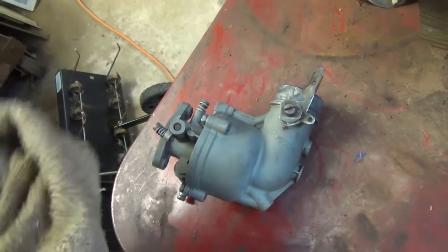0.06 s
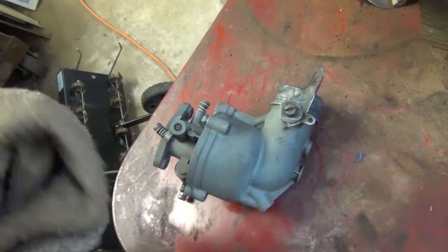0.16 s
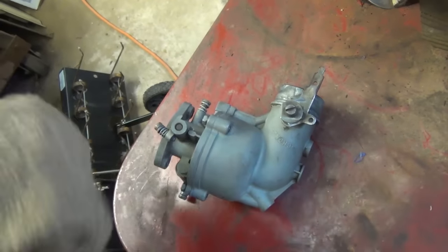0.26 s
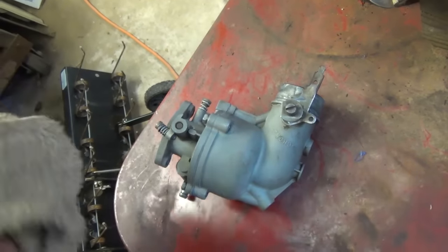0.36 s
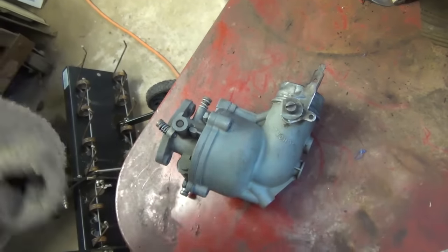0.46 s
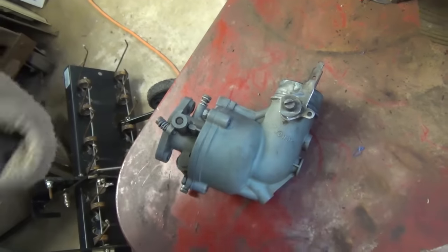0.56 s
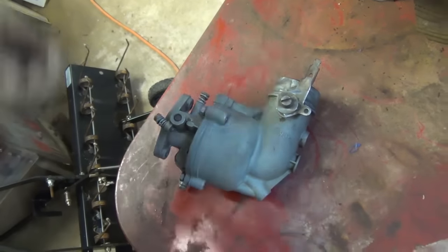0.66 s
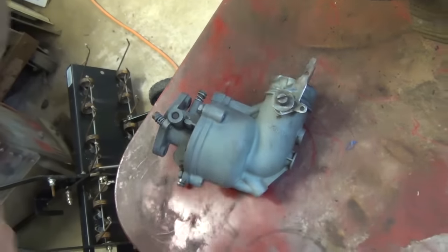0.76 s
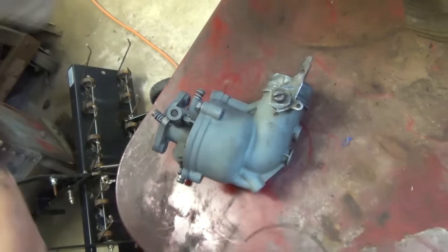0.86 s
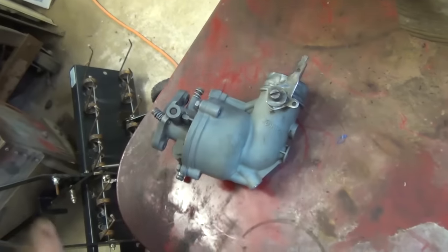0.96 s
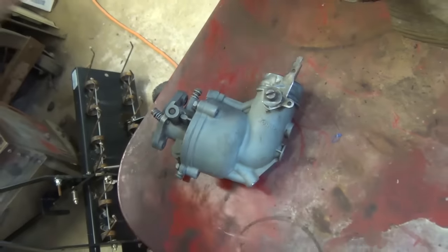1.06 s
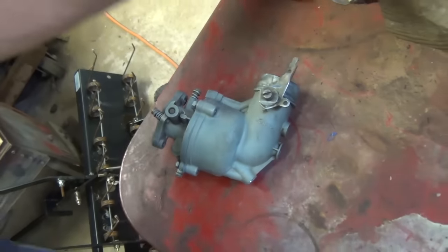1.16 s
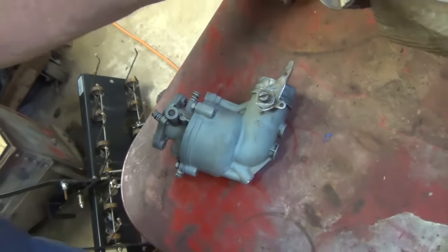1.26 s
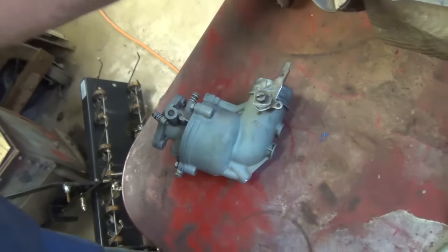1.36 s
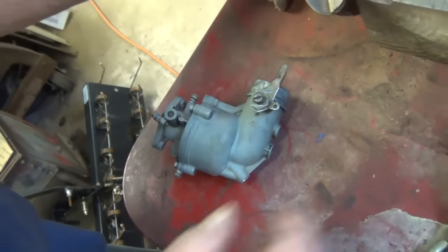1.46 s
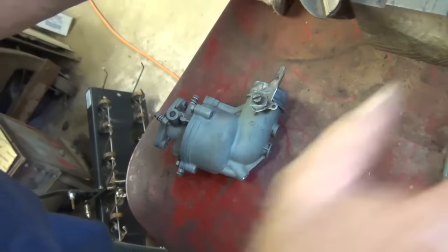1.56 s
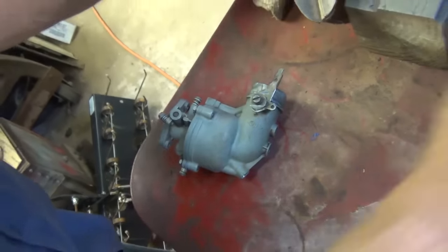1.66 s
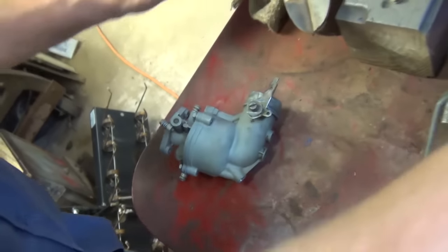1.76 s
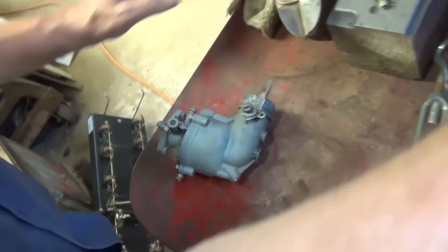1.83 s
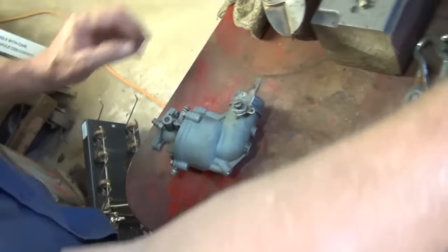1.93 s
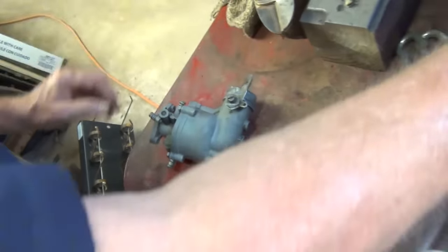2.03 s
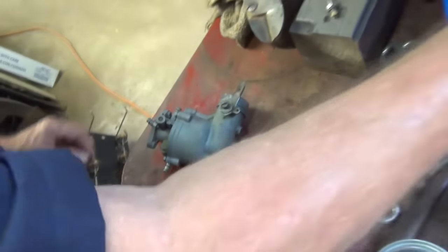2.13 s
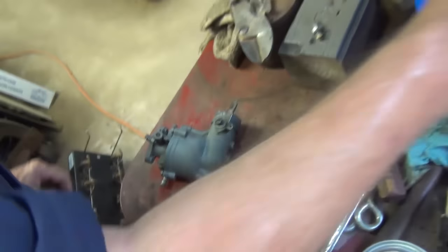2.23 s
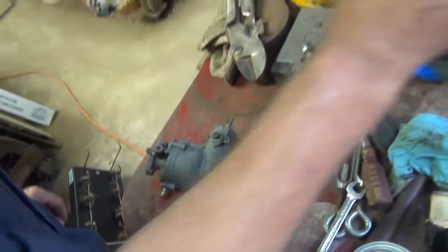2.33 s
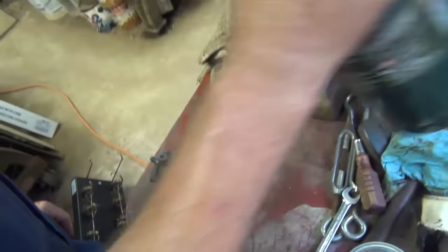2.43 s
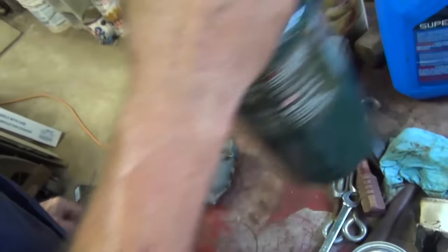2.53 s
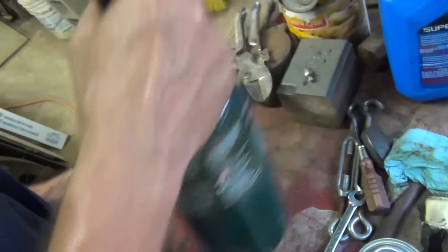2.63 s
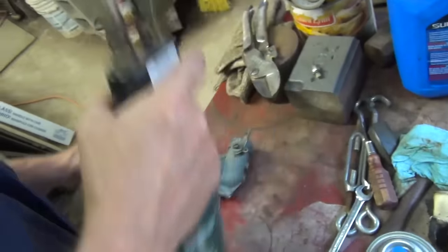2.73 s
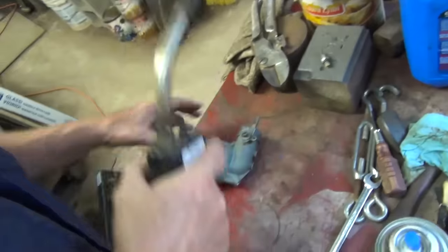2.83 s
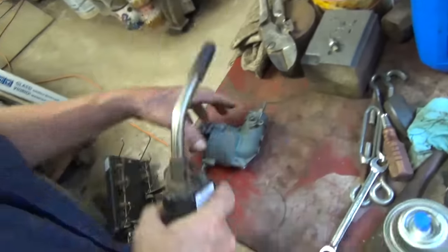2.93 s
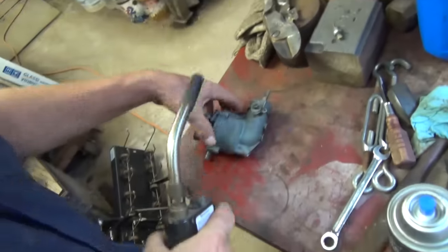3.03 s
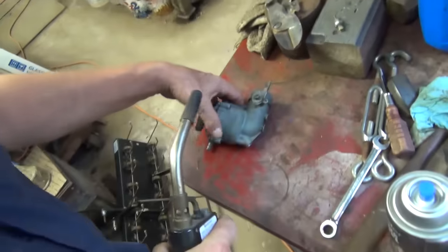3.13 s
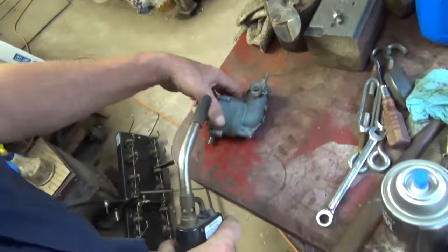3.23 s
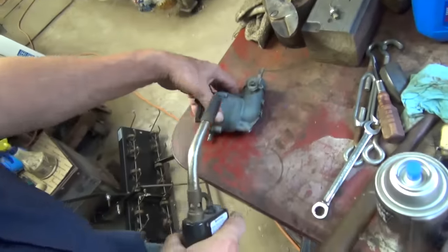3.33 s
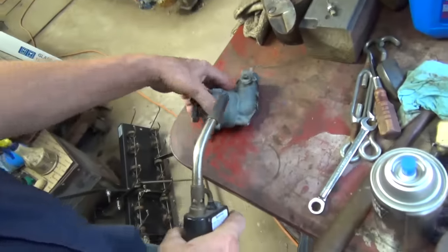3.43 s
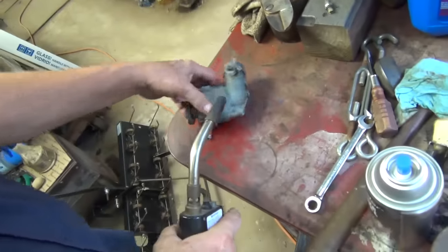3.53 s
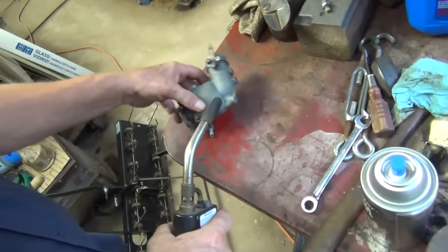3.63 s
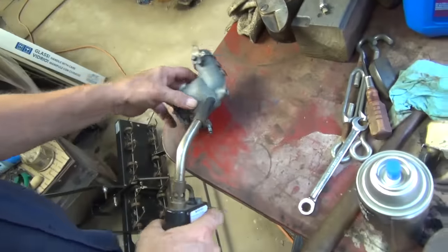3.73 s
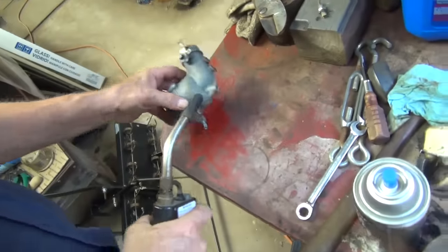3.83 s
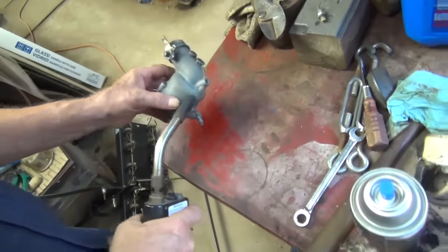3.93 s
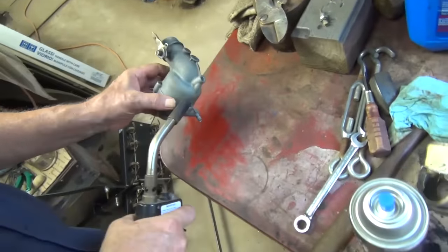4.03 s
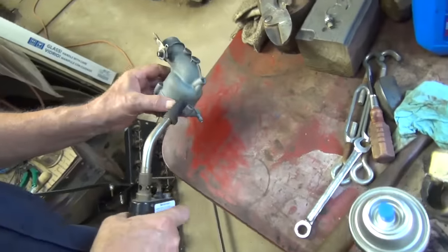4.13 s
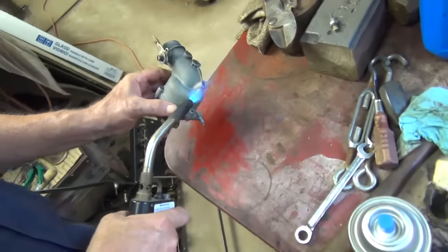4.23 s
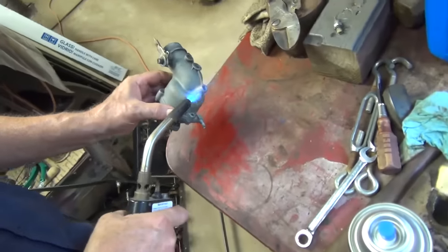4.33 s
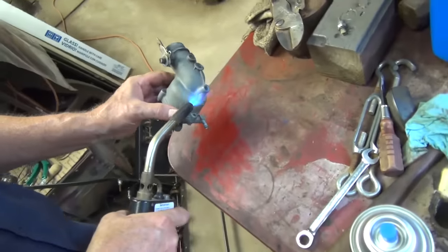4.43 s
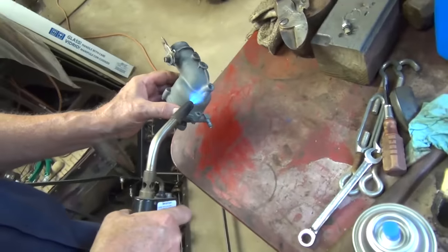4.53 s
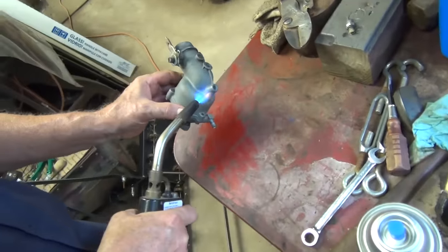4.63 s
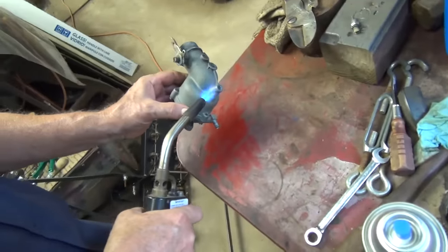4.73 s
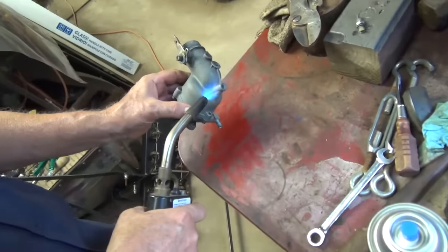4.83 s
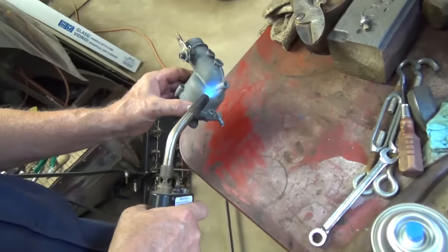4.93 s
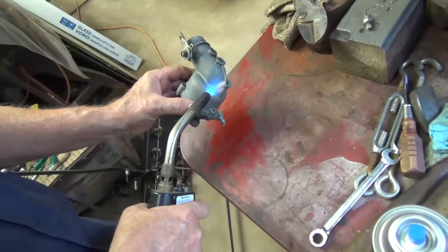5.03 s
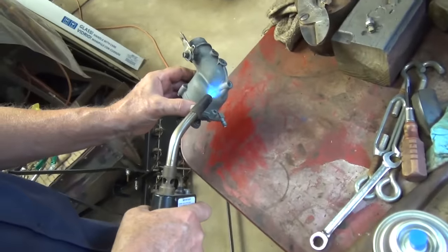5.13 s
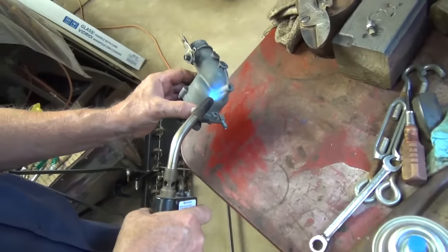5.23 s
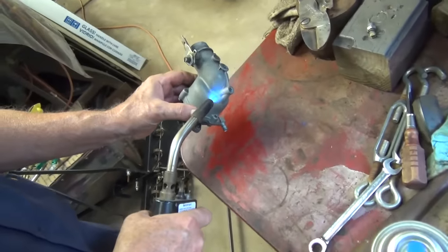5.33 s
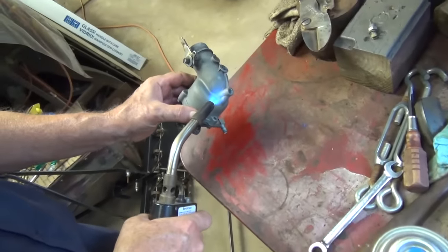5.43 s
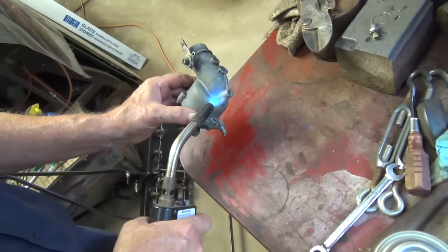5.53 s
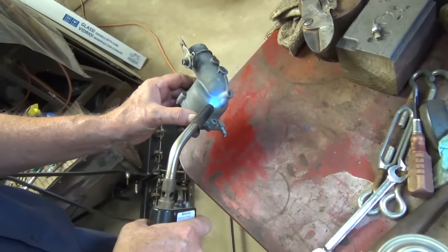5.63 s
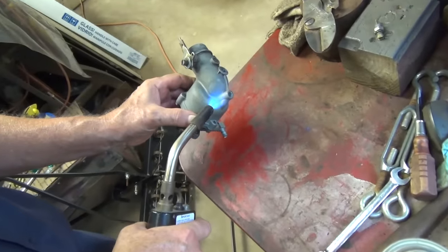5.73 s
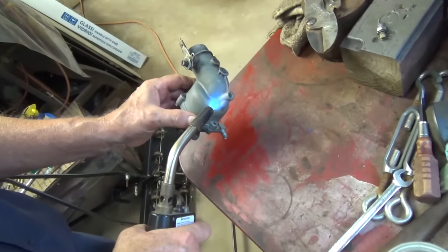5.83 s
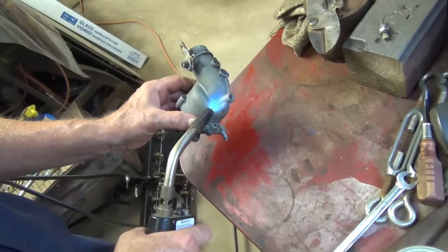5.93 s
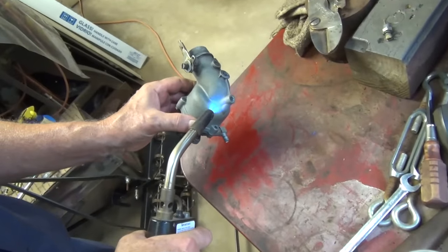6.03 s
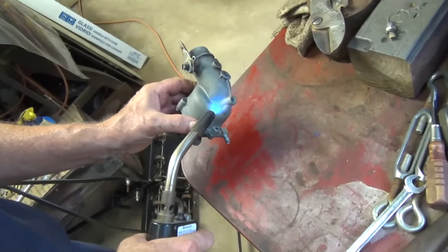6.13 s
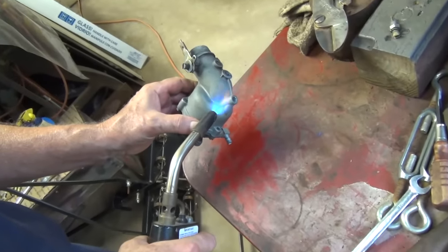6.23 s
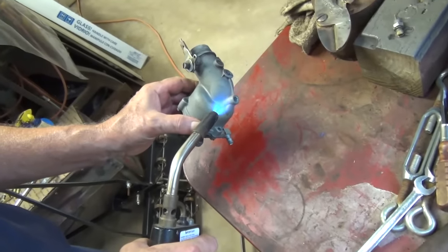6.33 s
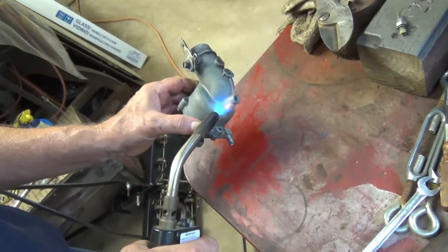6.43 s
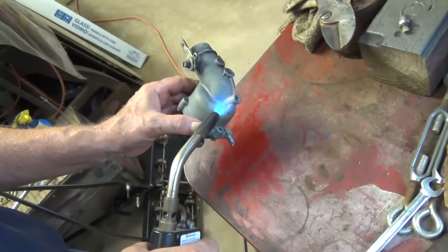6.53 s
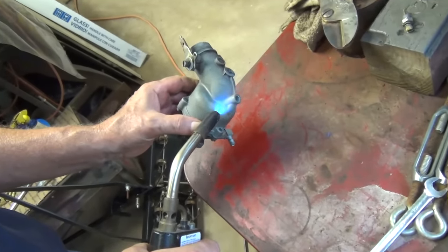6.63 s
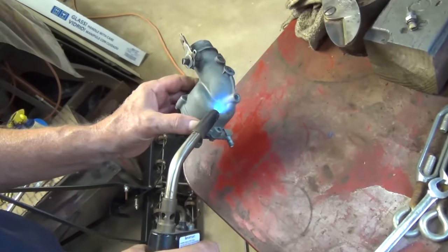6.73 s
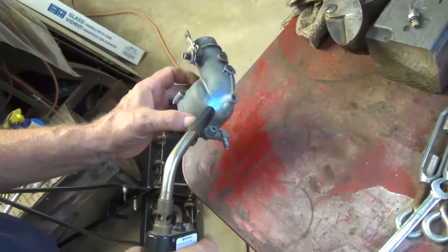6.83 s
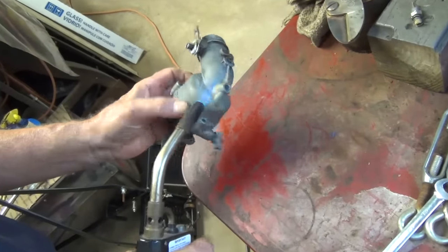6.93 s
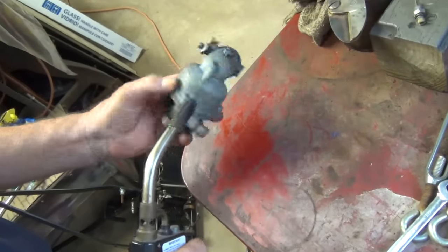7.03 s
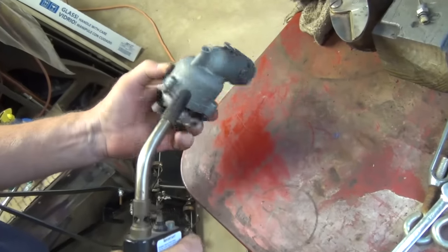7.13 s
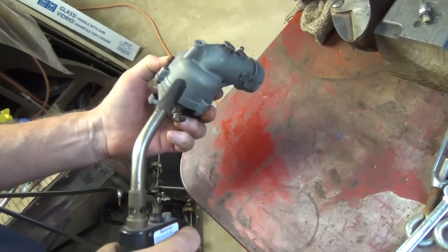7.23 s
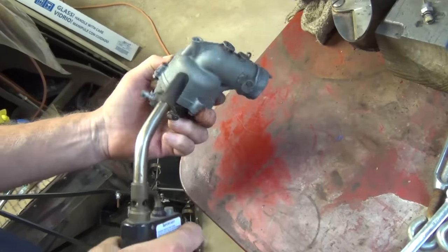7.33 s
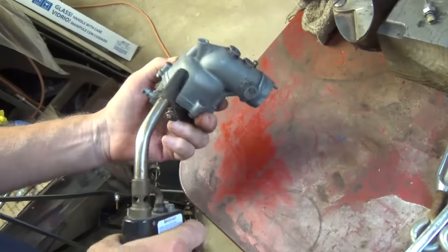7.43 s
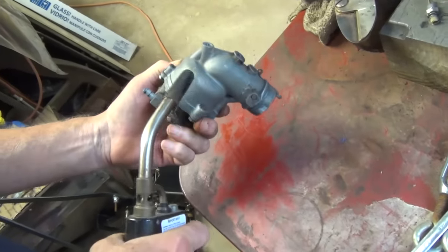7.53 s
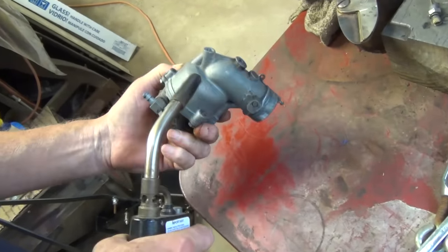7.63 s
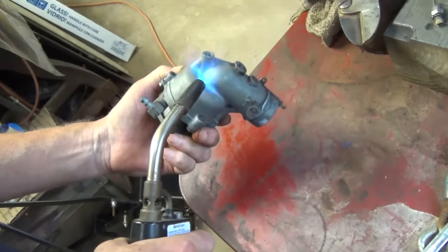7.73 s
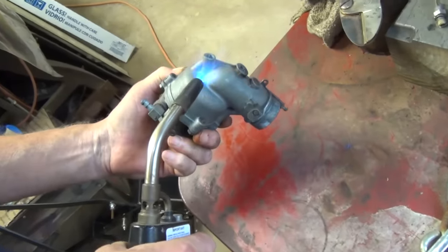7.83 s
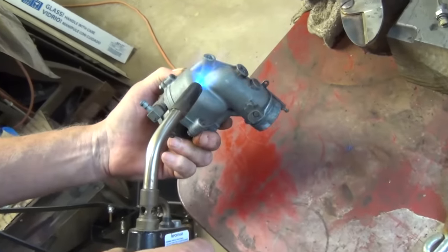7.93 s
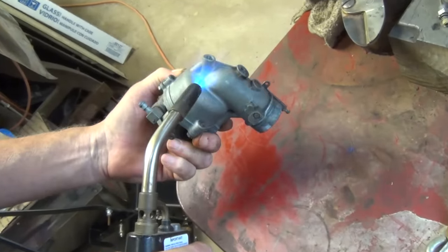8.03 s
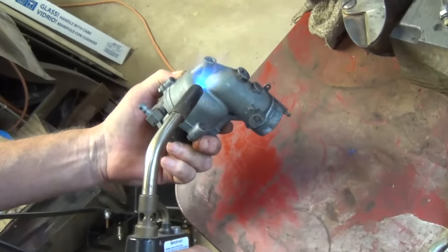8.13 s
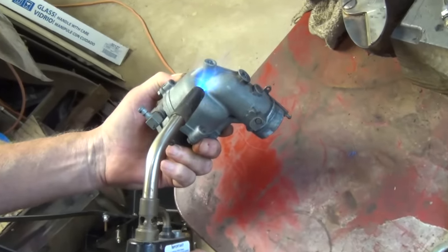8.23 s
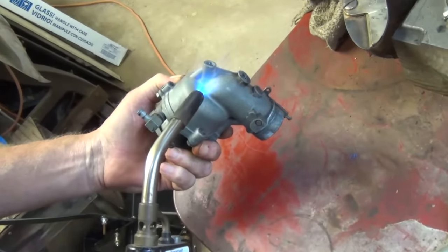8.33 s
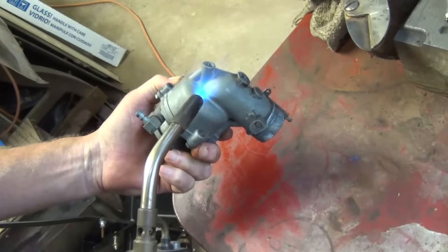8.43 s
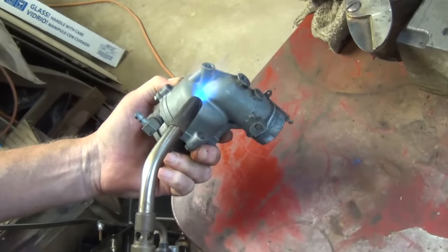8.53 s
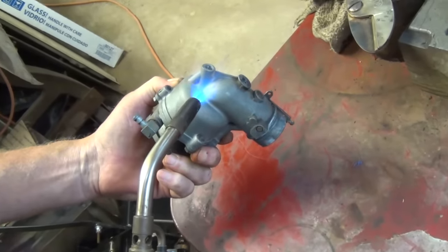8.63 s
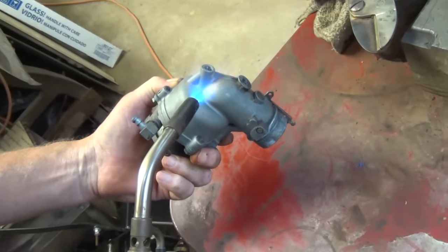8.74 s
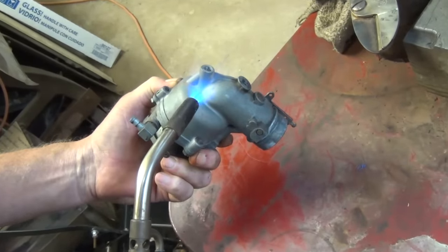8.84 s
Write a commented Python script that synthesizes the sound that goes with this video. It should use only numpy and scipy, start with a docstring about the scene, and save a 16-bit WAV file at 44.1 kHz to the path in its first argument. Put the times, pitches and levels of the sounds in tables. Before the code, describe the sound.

Knocks and dull bumps on a steel bench, gritty scrapes, then a gas torch hisses, snaps alight and roars, cuts out, and relights.

```python
"""A hand-held gas torch roars on a cast metal body over a steel workbench: gas hisses, the igniter snaps, flame catches.
Jet and flame are shaped noise, coloured by the tube and by where the flame plays; a low puff marks each lighting.
Before and between the burns come struck-mode knocks and bumps, noise clicks, gritty scrapes and a trigger squeak.
The torch is lit twice and still burns at the end. Behind it lie a faint lens-motor buzz, made by pulses ringing
a case, and the soft noise of a quiet workshop."""
import sys
import numpy as np
from scipy import signal
from scipy.fft import rfft, irfft, next_fast_len
from scipy.io import wavfile
from scipy.ndimage import uniform_filter1d

SR = 44100
rng = np.random.default_rng(int(sys.argv[2]) if len(sys.argv) > 2 else 0)


def file_out(sig):
    """Save sig as 16-bit WAV at sys.argv[1]."""
    # one column per channel
    cols = np.atleast_2d(sig).T
    # limit, then scale
    lim = np.clip(cols, -1, 1)
    pcm = np.round(lim * 32767).astype(np.int16)
    wavfile.write(sys.argv[1], SR, pcm)


N = 391166
FFT_SIZE = next_fast_len(N + 8192)
TIME, FREQ = np.arange(N) / SR, np.fft.rfftfreq(FFT_SIZE, 1 / SR)

# Torch burns: gas_on_s, valve_opening_s, gas_off_s, gas_db, flame_db, snap_db, puff_db
BURNS = [(4.060, 0.022, 6.946, -28, -15, -8.5, -6.5), (7.543, 0.017, 9.0, -26.5, -15, -8, -8)]
# Igniter snaps, one a burn: start_s
SPARK_TIMES = [4.2546, 7.7752]
# Spectrum of the burning jet's roar: freq_hz, level_db
FLAME_SPECTRUM = [(30, -39), (60, -28), (100, -18), (160, 0.5), (330, -1.04), (500, -5.5), (1000, -11),
                  (1500, -6), (2400, -12), (4500, -20), (8500, -15.5), (12000, -24.5), (15500, -35.5)]
# Spectrum of the unlit jet's hiss: freq_hz, level_db
GAS_SPECTRUM = [(30, -29), (400, -21.5), (1500, -10.5), (4000, -12.2), (6000, 1), (9500, -2), (13000, -8.5),
                (15500, -23.7)]
# Spectrum of the igniter snap: freq_hz, level_db
SNAP_SPECTRUM = [(200, -12), (1400, -6), (4000, -7), (8000, -2), (11000, 1), (16000, -17)]
# Peaks and notches that tube, casting and bench give the roar as the flame nears the casting,
# then plays on its edge, side and top: freq_hz, half_width_hz, gain_db
FLAME_NEARING = [(1038, 117, -5.5), (1236, 100, 2), (2116, 170, 2.5), (2570, 130, -9), (3150, 190, 2),
                 (4020, 170, -12), (4930, 532, -8), (7362, 530, -4.4), (14000, 974, -4)]
FLAME_ON_EDGE = [(193, 71, 3.3), (336, 20, 8), (934, 356, 4.5), (1024, 110, -10), (1680, 167, -4),
                 (2546, 120, -9), (2840, 140, -15), (2950, 580, -8), (3080, 1040, 13.5), (4586, 600, -11.5),
                 (5600, 400, 4.5), (7800, 1200, -2), (11071, 472, -3), (15239, 464, -2.6)]
FLAME_ON_SIDE = [(181, 6, 6), (259, 17, 3), (348.6, 12, 5.5), (407, 24, -4.5), (450, 51, 3), (603, 18, 6.5),
                 (725, 12, 6), (811, 9.4, 9.5), (1057, 57, -9.5), (1740, 110, -2.5), (2248, 205, 5),
                 (2890, 250, -8.5), (3520, 390, 7.9), (4935, 330, -10.4), (5806, 190, 8.5),
                 (6200, 150, -5.8), (6950, 410, -6.5), (8670, 200, -6), (10800, 560, -3), (13500, 331, -5)]
FLAME_ON_TOP = [(147, 10, -7), (409, 15, -7.5), (625, 41, -7), (718, 24, 3), (770, 16, -16), (806, 29, 6),
                (912, 35, -3.5), (1220, 232, 3.5), (1780, 75, -3), (2200, 190, -2), (2530, 76, -9),
                (3030, 110, 3.5), (3460, 220, 4.5), (3790, 96, -3.5), (5200, 118, -3), (6102, 260, 9.5),
                (6634, 590, -4.5), (9040, 1400, 3.5), (12092, 184, 1), (14364, 473, 0)]
# Path of the flame through those four aims: time_s, aim_index (no unit)
AIM_PATH = [(4.38, 0), (4.7, 1), (5.2, 2), (7.0, 2), (7.5, 3)]
# Burner-tube peaks and notches on the unlit jet, aimed at the side and the top: freq_hz, half_width_hz, gain_db
JET_AT_SIDE = [(1039, 265, 10), (1287, 509, -5), (2180, 60, 15), (2716, 197, 6), (3550, 105, 8),
               (4096, 560, -4), (4830, 172, 9), (5149, 138, -7), (6220, 173, 9), (6565, 189, -6.4),
               (7372, 257, -6.1), (7823, 240, 8), (9877, 307, -4.9), (11875, 332, 6)]
JET_AT_TOP = [(997, 60, 13), (1686, 136, 10), (1734, 350, -13.5), (2286, 360, 10.5), (3481, 116, 8.5),
              (4048, 697, -6.5), (5187, 220, -10.1), (6204, 1000, 4.5), (6600, 184, -7.1), (7271, 146, -13),
              (9400, 177, 6), (11000, 197, -6.0), (12302, 184, -1), (13960, 521, -13.0), (13978, 1000, 8.7)]

# Hard knocks on the bench: start_s, level_db
KNOCKS = [(0.005, -26.5), (0.037, -25), (0.160, -34), (0.1863, -22)]
# Modes of the steel top: pitch_hz, level_db, t60_s
BENCH_MODES = [(67, -7, 0.71), (132.3, -7, 1), (148, -8.5, 1.95), (223, -6, 0.29), (325, -5, .4),
               (390, -3, 0.35), (400, -4, 0.9), (562, -12, 0.22), (637, -4, 0.22), (783, -14, .35),
               (980, -17, .4)]
# Dull bumps of things picked up and moved: start_s, thud_db, thud_hz, thud_t60_s, clatter_db
BUMPS = [(1.158, -34, 246, .18, -28.5), (1.192, -36, 257, 0.11, -33), (1.228, -15, 183, 0.059, -38),
         (2.051, -17.5, 214, .053, -32.5), (2.079, -25, 195, .095, -49), (2.12, -22, 208, .07, -34),
         (2.142, -22, 199, 0.11, -36), (3.143, -29.5, 360, 0.1, -37), (3.407, -27, 148, 0.18, -37),
         (3.639, -23, 121, 0.19, -32), (3.664, -30, 150, .093, -28)]
# Light metal clicks of torch and casting: start_s, level_db
CLICKS = [(2.052, -37), (2.825, -34), (3.1856, -24.5), (3.6925, -25), (3.715, -32), (3.933, -25),
          (6.931, -20), (7.0518, -26.5), (7.093, -26)]
# Resonances of the clicking metal: pitch_hz, width_hz, level_db
METAL_MODES = [(1660, 260, -1), (2980, 790, -3.5), (3820, 330, -0.5), (4680, 240, -15), (6640, 490, -1.5),
               (9700, 280, -5)]
# Rubbing and dragging strokes: start_s, length_s, force_db
SCRAPES = [(1.338, .08, -8), (1.73, 0.28, -13), (2.04, .17, -12), (2.68, 0.099, -10), (3.233, .16, -5.5),
           (3.441, 0.073, -5.5), (3.475, 0.22, 0), (3.853, .13, -7.5), (7.034, 0.0156, -1)]
# Spectra of the gritty rasp and the bench rumble: freq_hz, level_db
RASP_SPECTRUM = [(300, -16), (900, -2), (1900, 1), (3000, -4.5), (4500, -7), (6000, -5), (10000, -7.5),
                 (15000, -21)]
RUMBLE_SPECTRUM = [(80, -17), (200, -7), (380, 0.5), (560, -6.5), (900, -11), (2000, -31)]
# Slips of the trigger: start_s, length_s, level_db
SLIPS = [(7.006, .007, -25), (7.012, .013, -27.5)]

# Case resonances of the lens motor: freq_hz, half_width_hz, gain_db
LENS_CASE = [(4160, 300, 9.5), (4760, 255, 14.5), (5700, 520, 8), (9020, 1240, 19.5), (12600, 1360, 12.5)]
# Quiet workshop noise: freq_hz, level_db
AIR_SPECTRUM = [(20, -15), (70, 1.5), (140, 0.5), (300, -3), (800, -8.5), (1300, -15), (1900, -17.5),
                (2700, -22.5), (7000, -21), (15000, -40)]
# Peaks and notches of the workshop noise: freq_hz, half_width_hz, gain_db
AIR_PEAKS = [(426, 54, -4), (540, 41, 2.5), (675, 57, -2.5), (830, 100, 2), (1135, 26, 6.5),
             (1840, 160, 2.5)]
# Stereo balance: freq_hz, left_minus_right_db
BALANCE = [(60, 3.5), (125, 2), (250, -0.8), (420, -0.5), (650, -3.5), (1000, -1.1), (2000, 0.5),
           (15000, -0.5)]

# Ring and thud against the knock's clatter; the thud comes late, as the top flexes
KNOCK_RING_DB, KNOCK_THUD_DB, KNOCK_FLEX_S = -11.5, -2.5, 0.0117
# Loose parts: first bounce against the knock, then the loss at each further one
BOUNCE_DB, BOUNCE_LOSS_DB, BOUNCE_COUNT, BOUNCE_GAP_S = -16, 0.5, 3, 0.079
CLICK_T60_S = 0.026
STROKE_PEAK = 0.52  # share of a stroke spent swelling
# Levels at 0 dB force; growth is dB of rumble per dB of force
RASP_DB, RUMBLE_DB, RUMBLE_GROWTH = -33, -30.5, 1.7
# Settled pitch, share by which it starts flat, settling time constant
SQUEAK_HZ, SQUEAK_FLAT, SQUEAK_SETTLE_S = 3850, 0.035, 0.0056
# Mean pulse rate, steady level, starting offset, run-up time constant
LENS_HZ, LENS_DB, LENS_START_DB, LENS_RUN_UP_S = 156.7, -41.5, -6, 0.27
AIR_DB, HANDLING_ROOM_DB = -44.5, -8.0
EDGE_HZ = 15850  # top of the output band


def amp(db):
    """Decibels to gain."""
    return 10 ** (np.asarray(db) / 20)


def unit(x):
    """Scales to rms 1."""
    return x / np.sqrt(np.mean(x ** 2) + 1e-20)


def noise():
    """White noise as long as the scene."""
    return rng.standard_normal(N)


def slope(points):
    """A spectrum in dB from a few points, straight on a log-frequency axis."""
    hz, db = np.transpose(points)
    return np.interp(np.log(FREQ + 1), np.log(hz + 1), db)


def peaks(rows):
    """Bell-shaped peaks and notches in dB."""
    return sum(db * np.exp(-np.minimum(((FREQ - hz) / width) ** 2, 50)) for hz, width, db in rows)


def colour(x, db):
    """Filters by a spectrum in dB."""
    return irfft(rfft(x, FFT_SIZE) * amp(db), FFT_SIZE)[:N]


def wander(hz):
    """Random drift of rms 1, up to a given rate."""
    return unit(colour(noise(), -20 * np.log10(1 + (FREQ / hz) ** 4)))


def turbulence(lumps_db, lumps_hz):
    """White noise whose strength comes in lumps."""
    return noise() * amp(lumps_db * wander(lumps_hz))


def rise(s, length):
    """Goes smoothly from 0 to 1, beginning at s."""
    return np.sin(np.pi / 2 * np.clip((TIME - s) / length, 0, 1)) ** 2


def dying(t60, attack):
    """One second of a quick rise and an exponential fall."""
    t = TIME[:SR]
    return (1 - np.exp(-t / attack)) * np.exp(-np.log(1000) * t / t60)


def ring(hz, t60, attack):
    """One struck mode."""
    return np.sin(2 * np.pi * hz * TIME[:SR]) * dying(t60, attack)


def add(mix, s, sound):
    """Mixes a sound in at time s."""
    part = mix[max(round(s * SR), 0):][:len(sound)]
    part += sound[:len(part)]


def flame_roar():
    """Lumpy turbulence roars through resonances that crossfade as the flame moves over the casting."""
    eddies = turbulence(lumps_db=0.73, lumps_hz=110) * amp(0.45 * wander(13))
    place = np.interp(TIME, *np.transpose(AIM_PATH))
    roar = np.zeros(N)
    for k, aim in enumerate((FLAME_NEARING, FLAME_ON_EDGE, FLAME_ON_SIDE, FLAME_ON_TOP)):
        sound = unit(colour(eddies, slope(FLAME_SPECTRUM) + peaks(aim)))
        roar += np.maximum(1 - abs(place - k), 0) * sound
    return roar


def torch():
    """Gas hisses through the tube until the spark; the flame puffs alight, roars, and dies with the pressure."""
    roar = flame_roar()
    out = np.zeros(N)
    for burn, spark, tube in zip(BURNS, SPARK_TIMES, (JET_AT_SIDE, JET_AT_TOP)):
        on, opening, off, gas_db, flame_db, snap_db, puff_db = burn
        jet = unit(colour(noise(), slope(GAS_SPECTRUM) + peaks(tube)))
        snap = unit(colour(noise(), slope(SNAP_SPECTRUM)))[:SR]
        pressure = np.exp(-np.maximum(TIME - off, 0) / 0.026)  # the tube empties once the valve shuts
        out += amp(gas_db) * jet * rise(on, opening) * (1 - rise(spark + 0.022, 0.11))
        out += amp(flame_db) * roar * rise(spark - 0.008, 0.062) * pressure
        add(out, spark, amp(snap_db) * snap * dying(t60=0.015, attack=0.0001))
        # the gathered gas burns at once
        add(out, spark + 0.0044, amp(puff_db) * ring(hz=174, t60=0.077, attack=0.0016))
    # clutter on the bench ripples the hiss
    echoes = colour(workshop(out, t60=0.064), slope([(500, -32), (1100, -11.0), (15000, -13.5)]))
    return out + echoes


def clatter(edge_hz, t60):
    """The short, dull crunch of two things meeting: decaying band-limited noise."""
    band = signal.butter(2, [140, edge_hz], "band", fs=SR, output="sos")
    return unit(signal.sosfilt(band, rng.standard_normal(SR))) * dying(t60, attack=0.00065)


def thud(hz, t60):
    """A low damped mode with one overtone."""
    return np.sqrt(2) * (ring(hz, t60, attack=0.0019) + amp(-7) * ring(1.3 * hz, t60, attack=0.005))


def bench_ring():
    """The steel top rings in its modes; each spot on it favours other ones."""
    share_db = 2.7 * rng.standard_normal(len(BENCH_MODES))
    return sum(amp(mode_db + extra_db) * ring(hz, t60, attack=0.002)
               for (hz, mode_db, t60), extra_db in zip(BENCH_MODES, share_db))


def knocks():
    """A hard knock clatters, thuds and rings the steel top; loose parts on it bounce a few times afterwards."""
    out = np.zeros(N)
    for s, db in KNOCKS:
        strike = clatter(edge_hz=1040, t60=0.083) + amp(KNOCK_RING_DB) * bench_ring()
        add(out, s, amp(db) * strike)
        add(out, s + KNOCK_FLEX_S, amp(db + KNOCK_THUD_DB) * thud(hz=121, t60=0.16))
        for k in range(BOUNCE_COUNT):
            bounce_db = db + BOUNCE_DB - k * BOUNCE_LOSS_DB
            add(out, s + (k + 1) * BOUNCE_GAP_S, amp(bounce_db) * clatter(edge_hz=610, t60=0.11))
    return out


def bumps():
    """Each bump is a damped thud and a short clatter."""
    out = np.zeros(N)
    for s, thud_db, hz, t60, clatter_db in BUMPS:
        add(out, s, amp(thud_db) * thud(hz, t60))
        add(out, s, amp(clatter_db) * clatter(edge_hz=720, t60=0.097))
    return out


def clicks():
    """Metal parts held in the hand tick with broad, quickly damped resonances."""
    out = np.zeros(N)
    for s, db in CLICKS:
        add(out, s, amp(db) * rng.standard_normal(SR) * dying(CLICK_T60_S, attack=0.00015))
    body = sum(amp(db) ** 2 / (1 + (2 * (FREQ - hz) / width) ** 2) for hz, width, db in METAL_MODES)
    return colour(out, 10 * np.log10(body / body.mean()))


def scrapes():
    """Gritty strokes swell and fade; the harder one presses, the more the bench rumbles under the rasp."""
    rasp = unit(colour(turbulence(lumps_db=2.5, lumps_hz=300), slope(RASP_SPECTRUM)))
    rumble = unit(colour(turbulence(lumps_db=-1.5, lumps_hz=70), slope(RUMBLE_SPECTRUM)))
    out = np.zeros(N)
    for start, length, force_db in SCRAPES:
        stroke = np.interp((TIME - start) / length, [0, STROKE_PEAK, 1], [0, 1, 0])
        out += stroke * amp(RASP_DB + force_db) * rasp
        out += stroke * amp(RUMBLE_DB + RUMBLE_GROWTH * force_db) * rumble
    return out


def squeak():
    """The trigger slides back in two slips; its three-harmonic squeak starts flat and settles on pitch."""
    since = np.maximum(TIME - SLIPS[0][0], 0)
    hz = SQUEAK_HZ * (1 - SQUEAK_FLAT * np.exp(-since / SQUEAK_SETTLE_S))
    phase = 2 * np.pi * np.cumsum(hz * (1 + 0.0086 * wander(300))) / SR
    tone = 0.68 * np.sin(phase) + np.sin(2 * phase) + 0.52 * np.sin(3 * phase)
    slips = np.zeros(N)
    for s, length, db in SLIPS:
        slips += amp(db) * np.sin(np.pi * np.clip((TIME - s) / length, 0, 1)) ** 2
    return tone * slips


def lens_motor():
    """A fast pulse train rings the camera case by shifting paths, over a hiss that throbs twice a cycle."""
    turns = np.cumsum(LENS_HZ * (1 + 0.006 * wander(2.0) + 0.00193 * wander(125))) / SR
    kicks = np.exp(-((turns % 1 - 0.5) / 0.004) ** 2)
    kicks -= kicks.mean()
    paths = rng.standard_normal((4, SR)) * dying(t60=0.039, attack=0.0004)
    whine = sum(wander(2.2) * unit(signal.oaconvolve(kicks, path)[:N]) for path in paths)
    whine /= np.sqrt(uniform_filter1d(whine ** 2, size=4096) + 1e-9)  # evens out the loudness
    whine = colour(whine, slope([(6000, -3.0), (9000, -8.5), (13000, -4)]))
    hiss = (1 + 0.24 * np.cos(4 * np.pi * turns)) * noise()
    hiss = colour(hiss, slope([(6000, -3), (8500, -1.0), (13000, -3)]))
    case = slope([(30, -62), (2000, -26), (3800, -1), (13500, 1.5), (15500, -10)]) + peaks(LENS_CASE)
    level_db = LENS_DB + LENS_START_DB * np.exp(-TIME / LENS_RUN_UP_S)  # starts quieter and runs up
    return amp(level_db) * unit(colour(whine + hiss, case))


def workshop_air():
    """The quiet room's steady noise, mostly low, with a few broad resonances."""
    return amp(AIR_DB) * unit(colour(noise(), slope(AIR_SPECTRUM) + peaks(AIR_PEAKS)))


def workshop(x, t60):
    """Sparse reflections from bench and walls."""
    hits = rng.random(SR) < 2500 / SR  # about 2500 reflections a second
    taps = rng.standard_normal(SR) * hits * dying(t60, attack=0.0013)
    return signal.oaconvolve(x, taps / np.linalg.norm(taps))[:N]


def scene():
    """Everything reaches the two close microphone ports almost alike."""
    handling = knocks() + bumps() + clicks() + scrapes() + squeak()
    handling_room = amp(HANDLING_ROOM_DB) * workshop(handling, t60=0.25)
    mid = torch() + handling + handling_room + workshop_air() + lens_motor()
    side_db = slope([(60, -16), (200, -22.0), (550, -19.5), (1100, -14.5), (2200, -37.5),
                     (8500, -21.5), (13000, -24)])
    side = colour(workshop(mid, t60=0.062), side_db)
    tilt_db = slope(BALANCE) / 2
    return np.array([colour(mid + side, tilt_db), colour(mid - side, -tilt_db)])


def record(dry):
    """Rounds off the highest peaks by soft saturation and limits the band."""
    headroom = amp(6.0)
    rounded = headroom * np.tanh(dry / headroom)
    lowpass = signal.firwin(511, EDGE_HZ, window=("kaiser", 9), fs=SR)
    return signal.oaconvolve(rounded, lowpass[None], "same", axes=1)


dry = scene()
out = record(dry)
file_out(out)
```